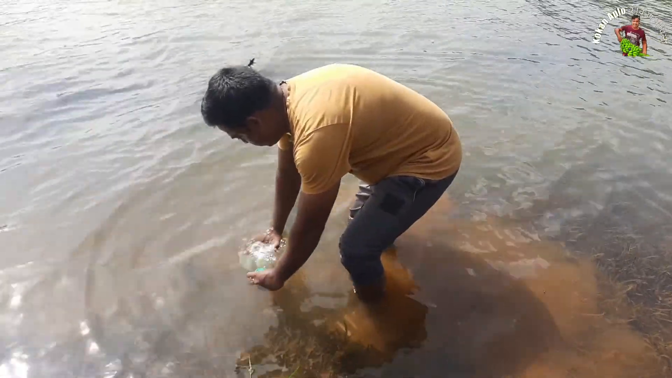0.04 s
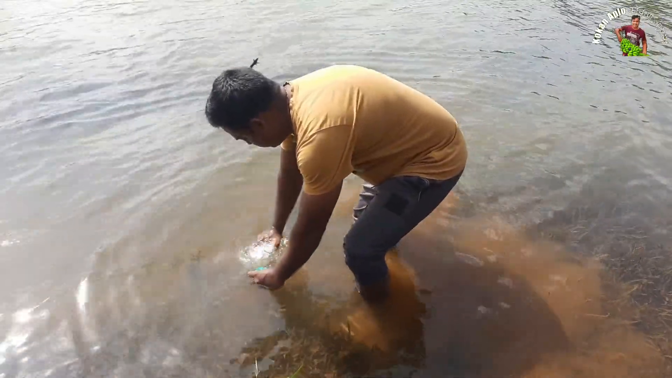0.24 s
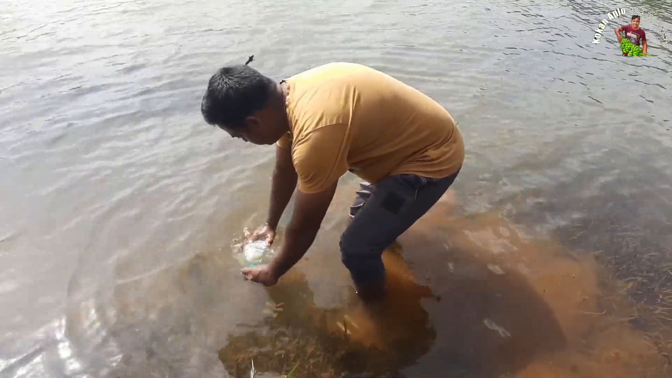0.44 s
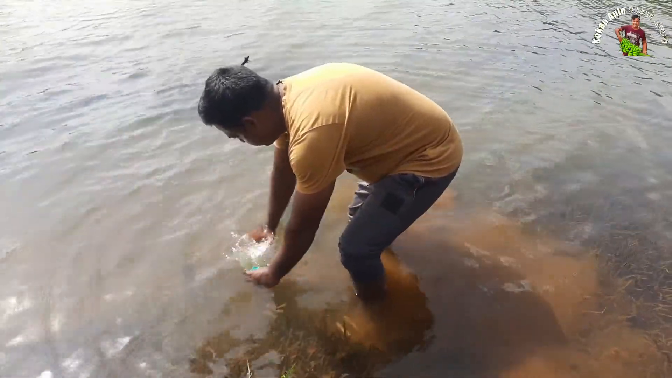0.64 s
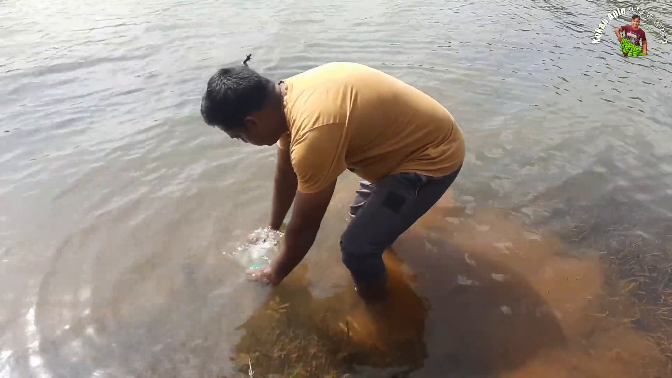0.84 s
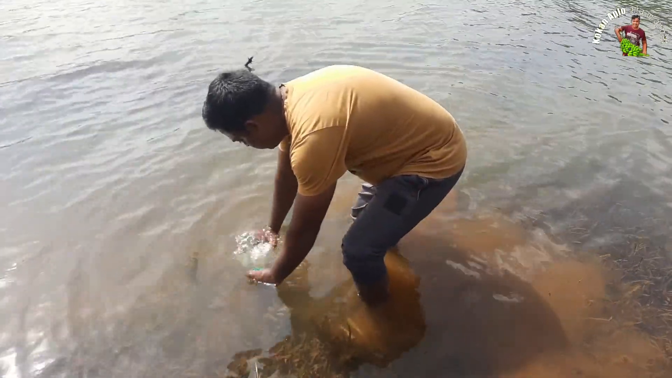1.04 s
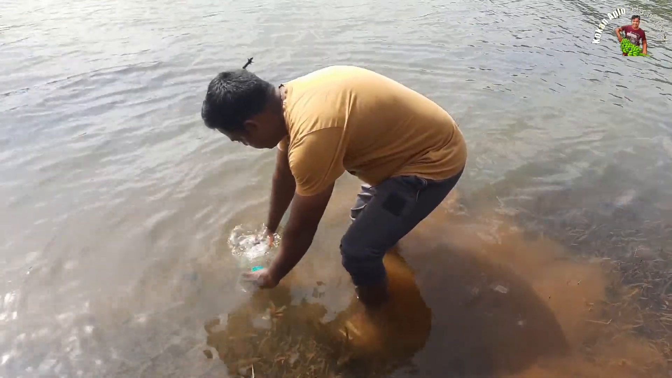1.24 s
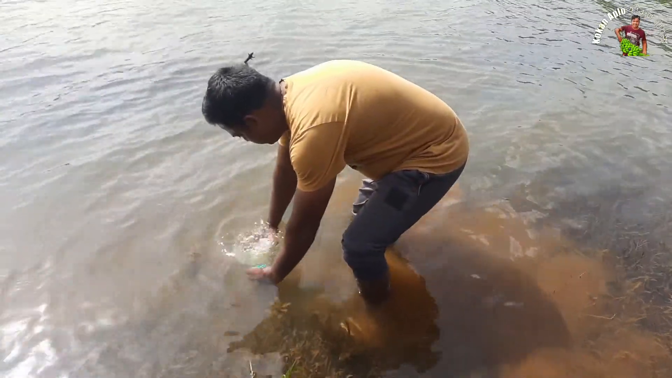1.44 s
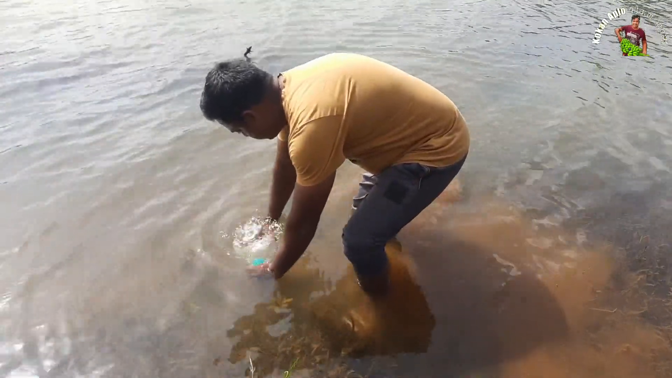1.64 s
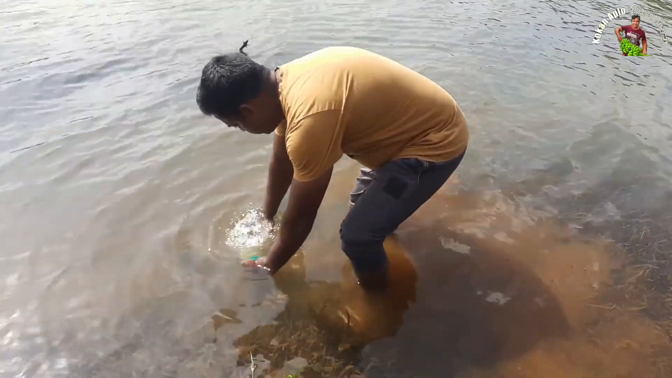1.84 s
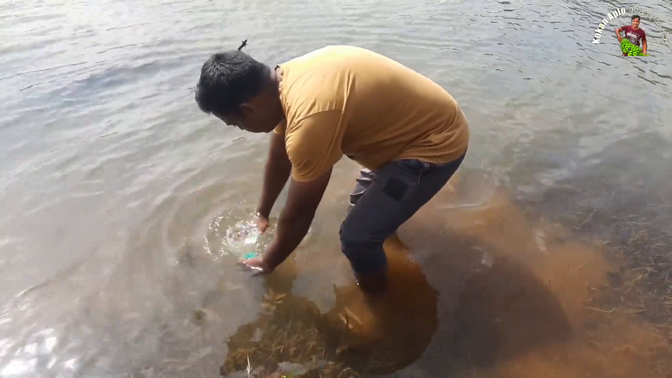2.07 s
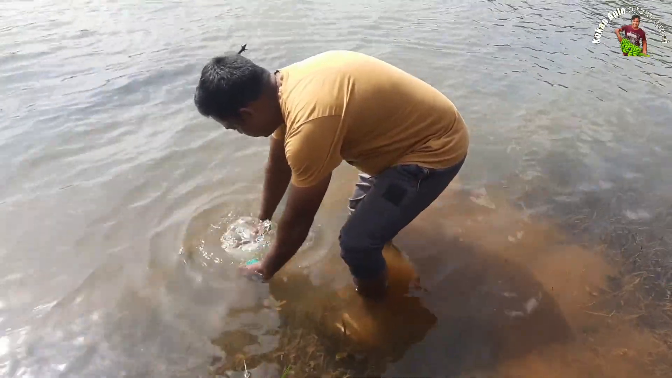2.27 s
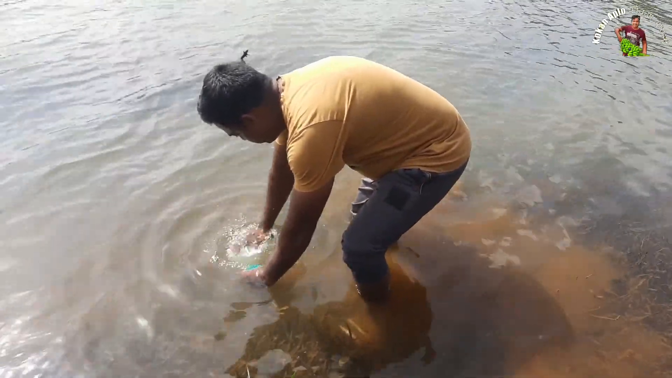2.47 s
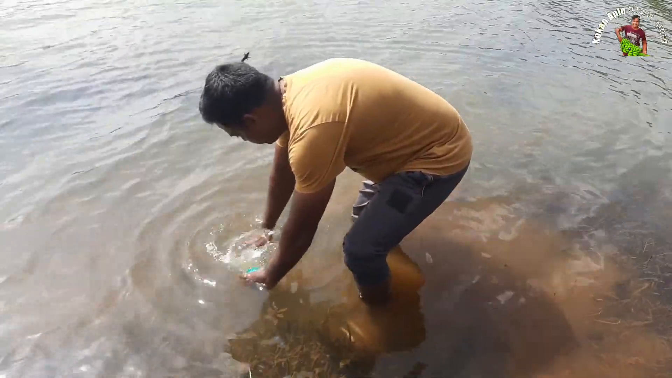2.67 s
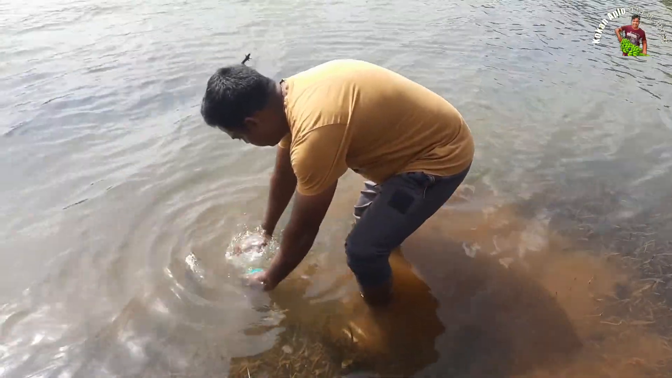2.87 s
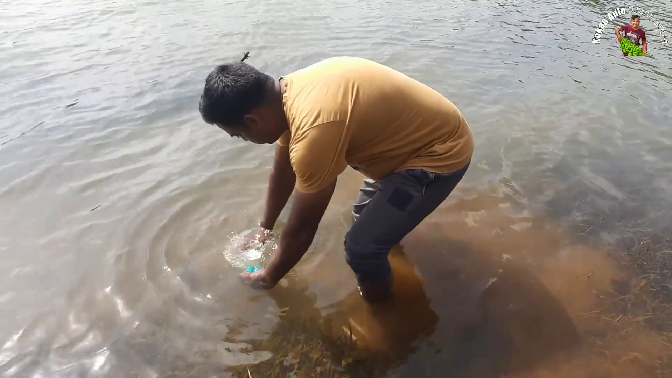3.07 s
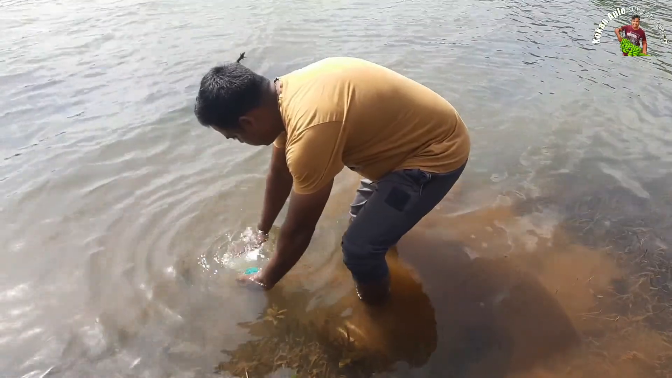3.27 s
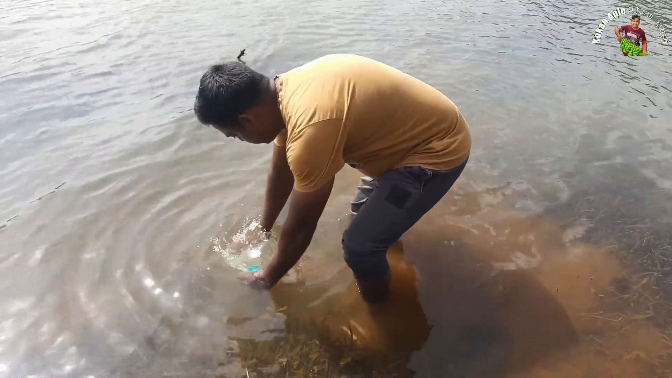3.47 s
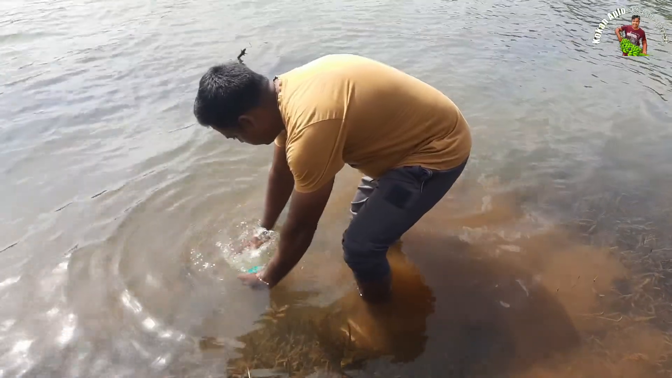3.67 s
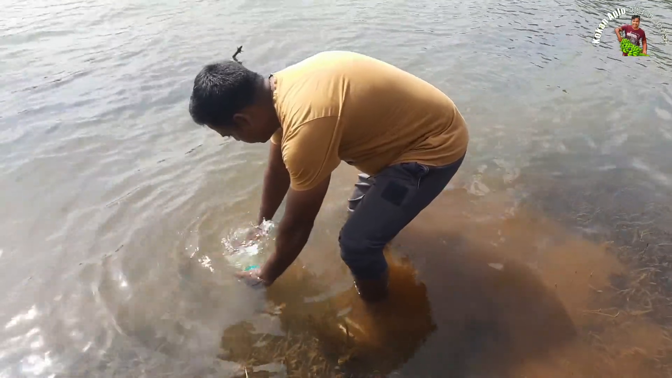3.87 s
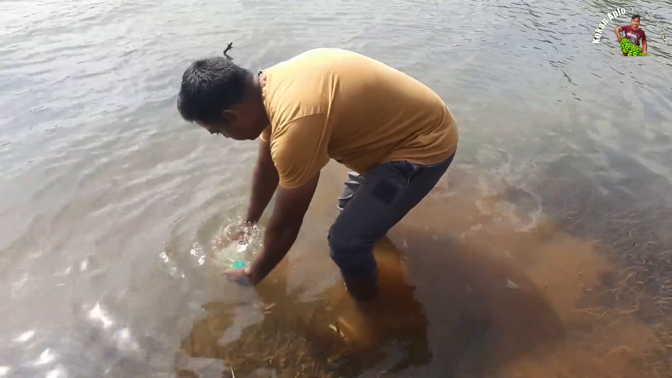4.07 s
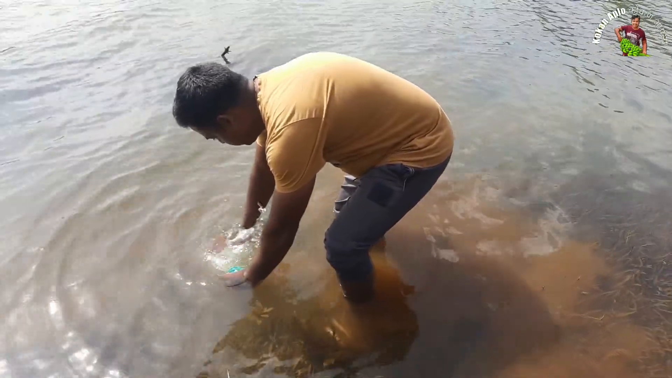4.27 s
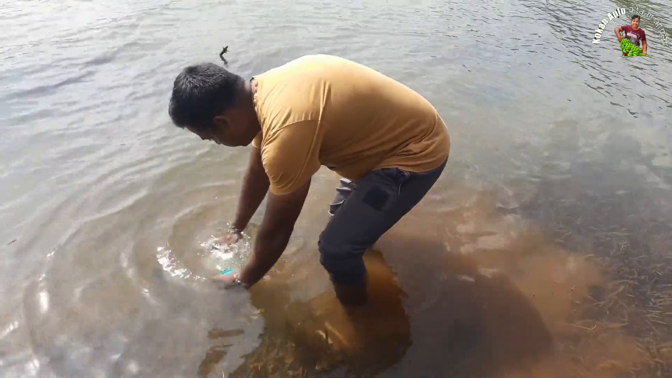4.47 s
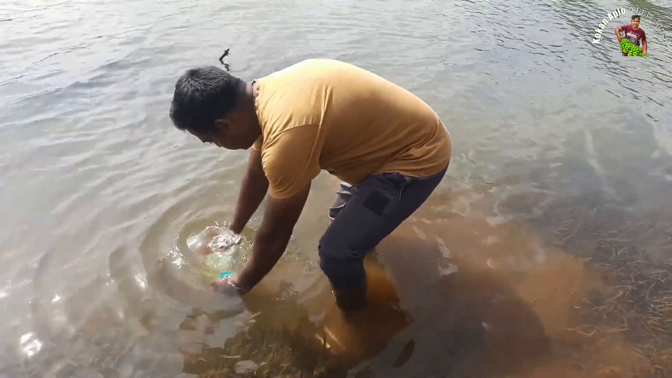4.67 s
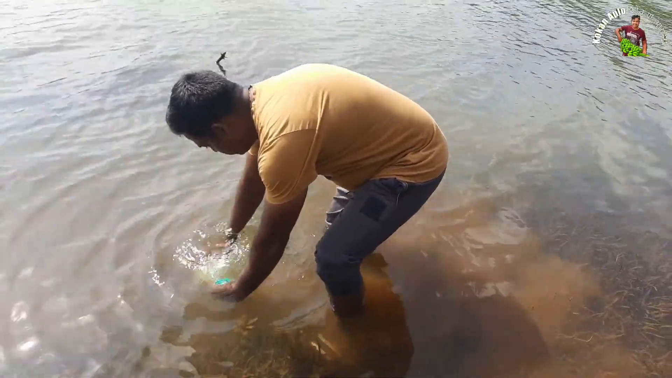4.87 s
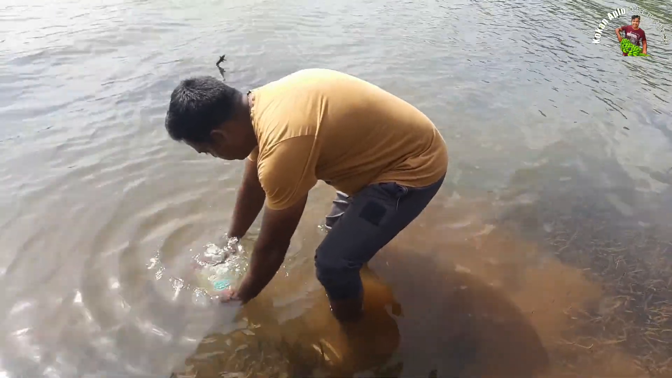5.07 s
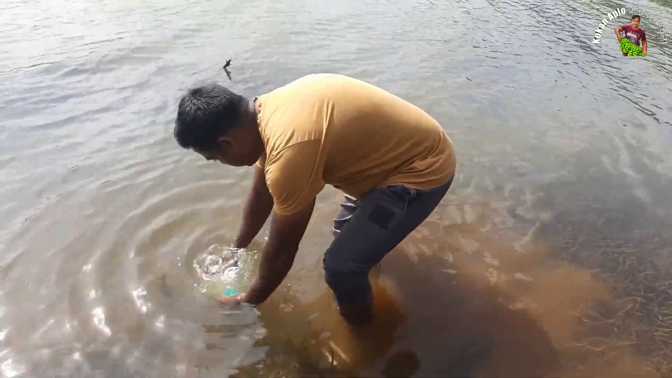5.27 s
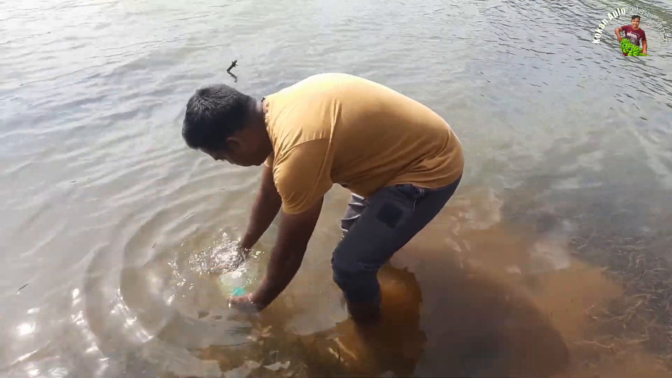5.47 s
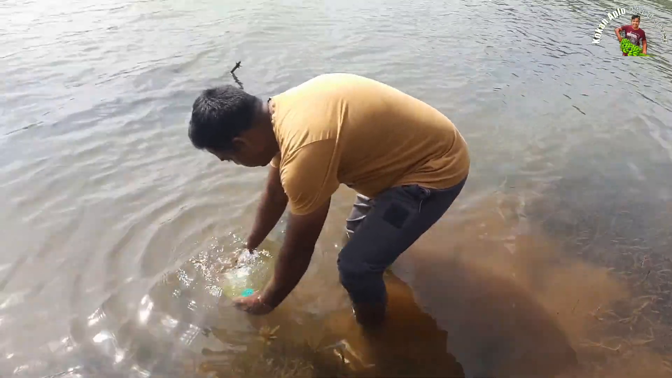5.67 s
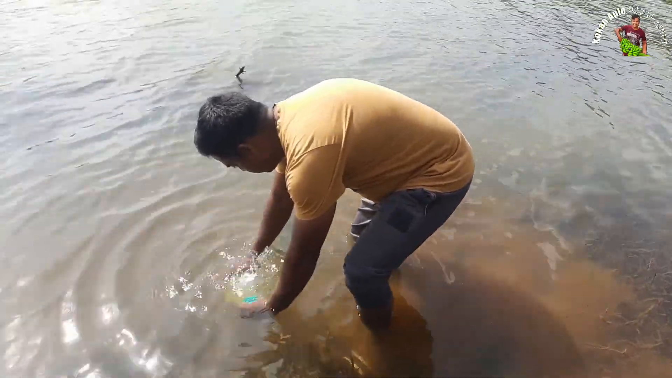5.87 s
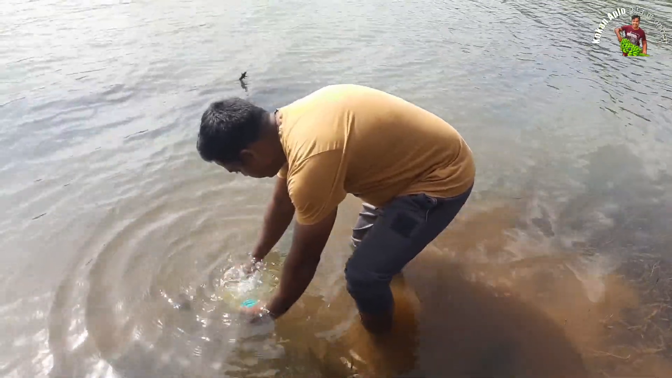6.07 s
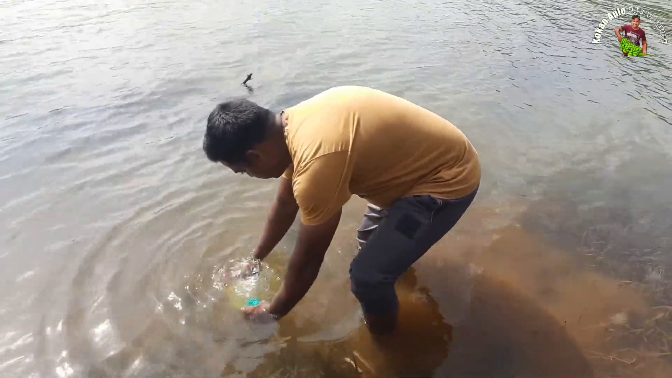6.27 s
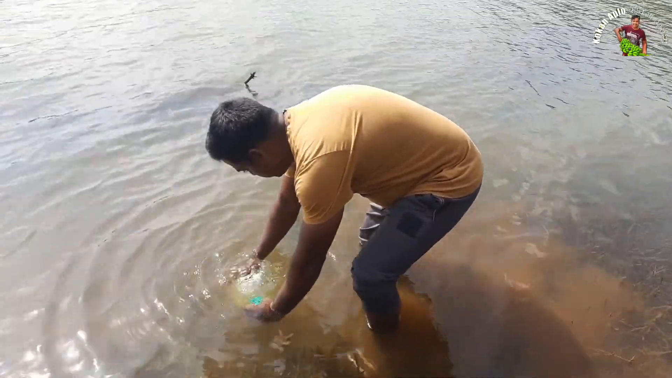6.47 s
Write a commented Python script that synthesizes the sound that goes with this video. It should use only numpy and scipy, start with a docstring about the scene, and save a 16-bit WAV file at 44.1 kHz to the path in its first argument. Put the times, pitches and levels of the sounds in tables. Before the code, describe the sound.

A plastic bottle is held under at a lake's edge and fills. A short slosh opens, then soft separate bubbles gurgle upward in pitch, with small plinks and ticks. A splashy burst comes near 2.4 seconds, the biggest gulp near 4.8, followed by dense popping and fizzing. Low wind thumps bump the microphone and strengthen toward the end. Outdoors, close, no echo, very faint insects behind.

```python
"""Water sloshes and the wind thumps the microphone: a plastic bottle is held under a lake and fills. Escaping
air gurgles as gliding tones that climb in pitch; sloshes are clouds of ringing bubbles. Bubble skins pop as
noise snaps with short tones, and spray patters as thousands of tiny rings over mist. Shaped noise makes the
breeze, a low thump at the end, the open air and the insects shrilling on shore. A bird calls far off in blurred
whistles."""
import sys
import numpy as np
from scipy import signal
from scipy.fft import rfft, irfft
from scipy.io import wavfile
from scipy.ndimage import uniform_filter1d

SR = 44100
rng = np.random.default_rng(int(sys.argv[2]) if len(sys.argv) > 2 else 0)


def unload_wav(signal):
    """Save mono or channel-first audio to the path in sys.argv[1] as 16-bit WAV at rate SR, clipped to [-1, 1]."""
    wavfile.write(
        sys.argv[1],
        SR,
        np.round(np.clip(np.atleast_2d(signal).T, -1, 1) * 32767).astype(np.int16),
    )


N = 287311  # length in samples
T = np.arange(N) / SR  # time of every sample, s


def undb(db):
    """Turn decibels into gain."""
    return 10 ** (np.asarray(db) / 20)


def unit(x):
    """Scale to an rms (average strength) of one."""
    return x / np.sqrt(np.mean(x ** 2) + 1e-20)


def curve(rows):
    """Join (time in s, value) rows by straight lines."""
    return np.interp(T, *np.transpose(rows))


def add(out, start_s, sound):
    """Mix a sound into out at the given time, cutting off whatever falls outside."""
    i = int(round(start_s * SR))
    lo, hi = max(i, 0), min(i + len(sound), len(out))
    if hi > lo:
        out[lo:hi] += sound[lo - i:hi - i]


def colour(x, points):
    """Filter a sound by a curve of (Hz, dB) points, at an rms of one."""
    hz, db = np.transpose(points)
    freq = np.maximum(np.fft.rfftfreq(len(x), 1 / SR), 1)
    gain = undb(np.interp(np.log(freq), np.log(hz), db))
    return unit(irfft(rfft(x) * gain, len(x)))


def noise():
    """Plain hiss for the whole scene."""
    return rng.standard_normal(N)


def walk(rate_hz):
    """Smooth random wandering with an rms of one; a higher rate wanders faster."""
    step = int(SR / rate_hz)
    stairs = np.repeat(rng.standard_normal(N // step + 1), step)
    return unit(uniform_filter1d(stairs, step)[:N])


def grain(hz, cycles, climb, swell=.0):
    """A small bubble rings for some cycles (to -60 dB) as its pitch climbs; swell softens the onset."""
    u = np.arange(int(cycles * SR / hz) + 2) * hz / (cycles * SR)  # 0 to 1 over the ring
    onset = 1 - np.exp(-u / (swell + 1e-9))
    tone = np.sin(2 * np.pi * cycles * u * (1 + climb * u / 2))
    return onset * tone * np.exp(-np.log(1000) * u)


# Tone of the open air. Columns: pitch_hz [Hz], strength_db [dB per Hz, relative]
AIR_COLOUR = [(30, -8.5), (120, 9.5), (250, 6.5), (500, -9), (1000, -8.5), (2200, -14.5), (4000, -14.5),
              (6500, -13.5), (10000, -15.5), (15000, -21.5)]
# Tone of the insects. Columns: pitch_hz [Hz], strength_db [dB per Hz, relative]
INSECT_TONE = [(5500, -35), (6700, -31), (7200, -4.5), (7800, -4.5), (8250, 3), (8700, 1.5), (9000, -4),
               (9300, -13), (11000, -30)]


def shore(air_db=-69, insect_db=-67.5, sway_db=1, shimmer_db=1.87):
    """Quiet air and a distant insect chorus are coloured noise; air sways slowly, insects shimmer faster."""
    air = colour(noise(), AIR_COLOUR) * undb(air_db + sway_db * walk(4.42))
    insects = colour(noise(), INSECT_TONE) * undb(insect_db + shimmer_db * walk(40))
    return air + insects


# Slow rise and fall of the breeze, joined by straight lines.
# Columns: time_s [s], level_db [dB before breeze gain]
SLOW_WIND = [(0, -44), (0.3, -47), (0.6, -54.5), (0.9, -56), (1.15, -70), (1.6, -62.5), (1.8, -67),
             (2.3, -68), (2.6, -67), (2.85, -59.5), (3.35, -58.5), (3.95, -62), (4.25, -58), (4.5, -40.5),
             (5.2, -46.5), (5.7, -40.5), (5.9, -49), (6.5, -31)]
# Short low swells of the wind's rumble, then in the last row a strong low thump at the very end. # Columns:
# peak_s [s], level_db [dB before breeze gain], half_length_s [s]
LOW_SWELLS = [(0.044, -34.5, 0.014), (0.25, -42.5, .05), (0.39, -44, .025), (0.803, -45.5, 0.054),
              (1.61, -56, 0.045), (2.174, -49, 0.099), (2.374, -43, 0.03), (2.472, -48, 0.021),
              (2.745, -41, 0.04), (2.814, -47, 0.063), (3.062, -45, 0.031), (3.131, -41.5, .018),
              (3.433, -43, 0.0072), (3.515, -45.5, 0.022), (3.797, -43.5, 0.02), (4.141, -43, 0.049),
              (4.32, -43.5, 0.027), (4.475, -41, 0.066), (4.757, -33, 0.019), (4.864, -32.5, 0.03),
              (5.101, -33.5, 0.039), (5.213, -34.5, .012), (5.38, -35.5, 0.088), (5.99, -33.5, 0.018),
              (6.058, -30, 0.039), (6.339, -27.5, 0.06), (6.53, -22, 0.035)]


def low_power():
    """Power of the low noise: the slow rise and fall of the breeze, plus the short low swells."""
    power = undb(curve(SLOW_WIND)) ** 2
    for peak_s, db, half in LOW_SWELLS:
        t = np.arange(-3 * half, 3 * half, 1 / SR)
        swell = undb(db) * np.exp(-(t / half) ** 2)
        add(power, peak_s + t[0], swell ** 2)
    return power


# Tone of the low noise on the microphone. Columns: pitch_hz [Hz], strength_db [dB per Hz, relative]
WIND_COLOUR = [(15, -33), (30, -13.5), (50, 0), (76, -0.5), (100, -8.5), (140, -17), (200, -25), (400, -45),
               (1000, -60.5), (3000, -68)]


def breeze(steadiness=0.88, gain_db=0.2):
    """Eddies rumble on the microphone: low noise, evened out, then set to the level of the moment; the same
    noise carries the thump at the end."""
    eddies = colour(noise(), WIND_COLOUR)
    strength = uniform_filter1d(np.abs(signal.hilbert(eddies)), SR // 25)
    return unit(eddies / strength ** steadiness) * np.sqrt(low_power()) * undb(gain_db)


# Changing fizz of the churned surface. Columns: time_s [s], level_db [dB before spray gain]
SLOW_FIZZ = [(0, -74), (0.6, -79), (1.5, -73.5), (2.9, -93), (3.4, -76.5), (3.95, -81), (4.3, -69.5),
             (4.68, -73.5), (4.95, -64), (5.21, -66.5), (5.52, -62), (5.8, -63), (5.98, -67.5), (6.5, -64)]
# Showers of fine spray. Columns: peak_s [s], level_db [dB before spray gain], fade_s [s]
SHOWERS = [(0.01, -56.5, 0.047), (0.43, -64, 0.067), (0.7, -68, 0.2), (1.41, -68, 0.039),
           (2.385, -71, 0.019), (2.45, -53, 0.053), (2.657, -57.5, 0.038), (3.31, -64, 0.03),
           (3.52, -62.5, 0.042), (4.556, -62, 0.027), (4.768, -57, 0.071), (5.63, -66, .07),
           (5.84, -65.5, 0.034), (6.15, -64.5, .04), (6.35, -58.5, 0.087)]


def spray_level(rise_s=0.031, puff_db=-31.5, puff_s=.018):
    """Spray in dB: the changing fizz, showers that rise and die away, and a puff from each pop."""
    power = undb(curve(SLOW_FIZZ)) ** 2
    for peak_s, db, fade_s in SHOWERS:
        slope_s = np.where(T < peak_s, rise_s, fade_s)
        power = power + (undb(db) * np.exp(-np.abs(T - peak_s) / slope_s)) ** 2
    puff = np.exp(-np.arange(SR // 5) / SR / puff_s)
    for start_s, db, _ in SKIN_POPS:
        add(power, start_s, (undb(db + puff_db) * puff) ** 2)
    return 10 * np.log10(power)


# Tone of the spray. Columns: pitch_hz [Hz], strength_db [dB, relative filter gain]
SPRAY_TONE = [(700, 4), (1600, -11), (2900, -8.5), (4000, -3), (5500, 1), (7500, 3), (10000, -1.5),
              (12500, -9), (15500, -14)]


def spray(scatter_db=4.0, mist_db=-4, gain_db=-2, lively_db=-65, count=5500):
    """Droplets and tiny bubbles tinkle over smooth mist; the weaker the spray, the more it is mist alone."""
    drops, level_db = np.zeros(N), spray_level()
    for when, size, ring, luck in rng.random((count, 4)):
        hz = 1500 + 12500 * size ** 1.3
        ring_s = 0.0014 + .016 * ring * np.sqrt(4000 / hz)
        # a few drops are much stronger than the rest
        strength = undb(scatter_db * min(-np.log(1 - luck), 4))
        drop = grain(hz, hz * ring_s, climb=.04, swell=0.0033)
        add(drops, when * N / SR, strength / np.sqrt(ring_s) * drop)
    lively = 1 / (1 + undb(lively_db - level_db) ** 2)  # share of drops, near 1 in strong spray
    mist = undb(mist_db) * noise()
    fizz = colour(unit(drops * np.sqrt(lively)) + mist, SPRAY_TONE)
    return fizz * undb(level_db + gain_db)


# Water folding over at the bottle's neck. Columns: middle_s [s], half_length_s [s],
# level_db [dB before gain and length scaling], centre_hz [Hz], spread_octaves [octaves]
NECK_SLOSHES = [(0.016, 0.024, -42.5, 211, 0.52), (.012, 0.017, -44.5, 690, 0.31),
                (.013, .025, -47.5, 1350, 0.5), (0.188, .045, -67.5, 1380, 0.51),
                (.244, .019, -63, 886, 0.356), (.32, .04, -70, 1620, 0.475), (.595, 0.046, -51, 258, 0.86),
                (.599, .023, -52.5, 730, 0.66), (0.791, 0.047, -63.5, 954, 0.39),
                (1.005, .022, -59, 700, 0.57), (1.076, 0.029, -69, 1300, .49),
                (1.326, .011, -59, 395, 0.63), (1.43, 0.031, -59, 997, 0.3), (1.438, 0.054, -64, 257, .42),
                (1.504, 0.023, -66, 706, 0.75), (1.841, .03, -61.5, 253, 0.2),
                (1.934, 0.0085, -59.5, 1420, 1.09), (2.413, 0.037, -45.5, 293, 0.79),
                (2.425, 0.0301, -43.5, 233.6, 0.16), (2.412, 0.014, -64, 2070, 0.12),
                (2.453, 0.037, -64, 3550, 0.061), (2.423, 0.049, -68, 4980, 0.065),
                (2.629, 0.0065, -55.5, 1765, 0.82), (2.832, 0.038, -63.5, 268, 0.5),
                (3.107, 0.021, -62.5, 504, 0.2), (3.32, 0.029, -64, 1250, 0.71),
                (3.402, 0.0039, -50.5, 668, 0.5), (3.432, 0.015, -58.5, 1060, 0.45),
                (3.486, 0.04, -67, 1076, 0.37), (3.469, 0.061, -60, 225, 0.36),
                (3.719, 0.014, -50.5, 300, 0.56), (3.745, 0.018, -71.5, 3450, 0.25),
                (3.993, 0.023, -56.5, 440, 0.4), (4.343, .004, -57, 2050, 0.31),
                (4.853, 0.023, -46, 434, 0.72), (4.918, .035, -51.5, 1284, 0.12),
                (5.513, .04, -53, 558, 0.38), (5.689, 0.059, -57.5, 540, .53),
                (6.183, 0.046, -64, 765, 0.5), (6.437, .045, -67, 563, .78)]


def sloshes(ring_s=0.04, scatter_db=2, swell=0.049, lead_s=.005, wash_db=-6, gain_db=-1, count=30):
    """Each slosh is a cloud of damped bubbles in a low rush of water; larger bubbles ring longer."""
    out, t = np.zeros(N), np.arange(SR) / SR - .5
    for middle_s, half, db, centre, spread in NECK_SLOSHES:
        cloud = np.zeros(SR)
        chances = rng.standard_normal((count, 3))
        for size, (when, jitter, strength) in zip(np.linspace(-1, 1, count), chances):
            hz = centre * 2 ** (spread * (size + size ** 3 / 2 + jitter / 10))
            ring = grain(hz, ring_s * np.sqrt(700 * hz), .14, swell)  # ring_s holds at 700 Hz
            gain = undb(scatter_db * strength - 3.0 * size ** 2)
            add(cloud, .5 - lead_s + 0.54 * half * np.clip(when, -2, 2), gain * ring)
        # the rush stops sharply four spreads below the centre pitch: (spreads, dB)
        edge = [(-5, -27), (-4, -27 + 28 / 3), (-3.9999, -94)]
        low_tone = [(centre * 2 ** (k * spread), drop_db) for k, drop_db in edge]
        rush = colour(rng.standard_normal(SR), low_tone) * np.exp(-(t / (1.53 * half)) ** 2)
        slosh = unit(cloud) + undb(wash_db) * unit(rush)
        add(out, middle_s - .5, undb(db + gain_db) * slosh * np.sqrt(2 * half))
    return out


def simmer(db=-61, range_db=10, lowest_hz=1300, octaves=2.2, cycles=40, climb=0.084, after_s=.03, count=12):
    """Little bubbles tick at the surface during each slosh and in its wake."""
    out = np.zeros(N)
    for middle_s, half, _, _, _ in NECK_SLOSHES:
        for when, size, weakness in rng.random((count, 3)):
            tick = grain(lowest_hz * 2 ** (octaves * size), cycles, climb, swell=0.024)
            start_s = middle_s - half + (3 * half + after_s) * when
            add(out, start_s, undb(db - range_db * weakness) * tick)
    return out


# Bursting skins and droplets. Columns: start_s [s, before a tiny delay],
# peak_db [dB before pop gain], pitch_hz [Hz]
SKIN_POPS = [(0.23, -36.5, 8400), (0.3918, -38, 4630), (1.0949, -40.5, 8430), (1.2035, -46, 8000),
             (1.375, -43.5, 6060), (1.53, -44.5, 8750), (2.0814, -38, 7600), (2.4443, -38, 7050),
             (2.4683, -36, 7800), (2.5052, -36.5, 7830), (2.5208, -39, 8000), (2.6187, -31.5, 6360),
             (2.6558, -35, 7630), (3.0298, -35, 8600), (3.168, -46, 4300), (3.3965, -46, 7500),
             (3.5567, -43.5, 9240), (3.798, -40, 4280), (4.2285, -35, 2980), (4.8483, -37.5, 9370),
             (4.9258, -31.5, 8700), (4.938, -33, 5850), (4.9795, -36.5, 4770), (5.0068, -36, 11200),
             (5.0333, -33.5, 4940), (5.0535, -33.5, 7450), (5.1, -33.5, 8700), (5.1048, -30, 5440),
             (5.1249, -31.5, 7150), (5.2615, -32.5, 6150), (5.2835, -31.5, 4090), (5.4263, -20, 7700),
             (5.4502, -35, 7300), (5.46, -31, 4740), (5.4939, -33.5, 6230), (5.5737, -37, 8370),
             (5.6125, -29.5, 6100), (5.6664, -35, 7000), (5.71, -37.5, 6000), (5.7835, -38, 7400),
             (6.107, -35, 9400), (6.2253, -35.5, 8530), (6.348, -35.5, 6670), (6.488, -36, 8570)]


def pops(snap_s=0.00014, patter_s=0.014, patter_db=-19, ring_db=-5, ring_s=0.02, gain_db=-2.5,
         low_share=0.77, pair=0.863):
    """A skin snaps with a faint noise tail, and the cavity beneath rings with two close tones."""
    out, t = np.zeros(N), np.arange(SR // 20) / SR
    for start_s, db, hz in SKIN_POPS:
        # a small cavity radiates little below its own pitch
        band = signal.butter(3, [min(low_share * hz, 5400), 12500], "band", fs=SR, output="sos")
        fade = np.exp(-t / snap_s) + undb(patter_db) * np.exp(-t / patter_s)
        pop = signal.sosfilt(band, rng.standard_normal(len(t)) * fade)
        pop = pop / np.abs(pop).max()
        add(pop, 0, undb(ring_db) * grain(hz, hz * ring_s, 0.052, 0.0056))
        add(pop, 0, undb(ring_db) / 2 * grain(pair * hz, hz * ring_s, 0.12, 0.0056))
        add(out, start_s + 0.00089, undb(db + gain_db) * pop / np.abs(pop).max())
    return out


# Gulps of air. Columns: loudest_s [s], pitch_hz [Hz at that moment, before wobble],
# climb [octaves per s], swell_s [s], peak_db [dB before flutter and bursting]
AIR_GULPS = [(0.809, 763, 28, .008, -52.5), (0.888, 638, 22.5, .014, -47), (0.933, 740, 6.5, .022, -45.5),
             (1.023, 1086, 14.5, .022, -48.5), (1.223, 339, 20.5, .032, -41), (1.348, 630, 12, .025, -49.5),
             (1.439, 1096, 18, .01, -53), (1.628, 331, 21.5, .02, -35.5), (1.695, 426, 19.5, .042, -59.5),
             (1.927, 476.6, 17, .038, -45), (2.079, 296.6, 20.5, .029, -54.5), (2.12, 612, 19.5, .025, -42),
             (2.305, 656, 15, .043, -44), (2.413, 545, 12.5, .019, -43), (2.56, 884, 16.5, .04, -62),
             (2.642, 1223, 35, .033, -51.5), (2.93, 675, 11, .05, -50), (3.16, 653, 6.5, .015, -48),
             (3.196, 960, 28, .013, -53.5), (3.312, 1295, 11.5, .038, -57), (3.744, 638, 24, .036, -52),
             (4.023, 597, 2, .035, -48.5), (4.067, 543, 21, .042, -38), (4.343, 730, 16, .045, -51),
             (4.401, 313.5, 16.5, .073, -44), (4.76, 387.5, 21, .06, -26.5), (4.866, 653, 21, .021, -34.5),
             (4.899, 747, 12, .012, -33), (5.13, 988, 22, .009, -48), (5.146, 1534, 37, .025, -55),
             (5.203, 264, 11, .084, -46.5), (5.268, 600, 13.5, .042, -52), (5.426, 346, 26.5, .02, -48.5),
             (5.492, 469.6, 11.5, .012, -31.5), (5.52, 594.5, 14, .03, -38.5),
             (5.592, 642, 16.5, .045, -47), (5.724, 677, 6.5, 0.014, -44), (5.763, 640, 22.5, .022, -40.5),
             (5.925, 1565, 30, .023, -49), (6.153, 830, 15.5, .007, -51), (6.235, 632, 25.5, .04, -44.5),
             (6.36, 624, 11, .07, -53), (6.372, 1625, 28, .009, -38.5), (6.418, 390, 25.5, .052, -54.5),
             (6.46, 650, 26, .019, -34.5)]
# Bubbles that pinch off at once and nearly hold their pitch. Columns: loudest_s [s],
# pitch_hz [Hz before wobble], peak_db [dB before flutter and bursting]
SUDDEN_PLINKS = [(0.752, 776, -44), (1.502, 770, -51.5), (1.717, 1260, -60.5), (1.755, 3600, -58),
                 (1.785, 1940, -59), (1.922, 527, -35.5), (2.351, 764, -36.5), (2.514, 1810, -50),
                 (2.89, 2430, -51), (3.556, 920, -47.5), (3.557, 1780, -53.5), (4.341, 2530, -46),
                 (4.914, 1330, -47), (4.983, 1330, -44.5), (5.054, 1090, -51.5), (5.365, 1193, -57),
                 (5.454, 800, -42), (5.683, 1240, -50.5), (5.874, 863, -46), (5.884, 1510, -46.5),
                 (6.181, 284, -46), (6.337, 3020, -52), (6.489, 3400, -54.5)]


def gurgles(wobble=0.041, flutter_db=2.0, overtone_db=-34, glide_limit_s=0.19, wash_db=-21, burst_hz=830,
            ring_s=.0098, ring_slope=.9, plink_climb=0.94, plink_attack_s=0.00159):
    """Each gulp swells at the neck and rings higher as the water above it thins; plinks start at once."""
    out, drift, flutter, ripple = np.zeros(N), walk(160), walk(130), walk(700)
    plinks = [(s, hz, plink_climb, plink_attack_s, db) for s, hz, db in SUDDEN_PLINKS]
    for loudest_s, hz, climb, swell, db in list(AIR_GULPS) + plinks:
        fade = ring_s * (1000 / hz) ** ring_slope  # ring_s holds at 1 kHz; higher bubbles fade sooner
        span = (T > loudest_s - swell) & (T < loudest_s + 5 * fade)
        t = T[span] - loudest_s
        pitch = hz * 2 ** (climb * np.minimum(t, glide_limit_s)) * (1 + wobble * drift[span])
        phase = 2 * np.pi * np.cumsum(pitch) / SR
        shape = np.where(t < 0, 1 + t / swell, np.exp(-np.abs(t / fade) ** 1.11))
        # a big bubble breaks the surface once its pitch has climbed far enough
        alive = 1 / (1 + (pitch / max(burst_hz, 1.23 * hz)) ** 16)
        # ripples on its wall blur the tone a little
        blur = undb(wash_db) * ripple[span] * np.cos(phase)
        tone = np.sin(phase) + undb(overtone_db) * np.sin(2 * phase) + blur
        out[span] += undb(db + flutter_db * flutter[span]) * shape * alive * tone
    return out


def offspring(below_db=-15, loudest_db=-51, after_s=.06, cycles=48, climb=0.19, octaves=2.9, count=3):
    """Every gulp sheds a few smaller, higher bubbles as it tears away from the neck."""
    out = np.zeros(N)
    for loudest_s, hz, _, _, db in AIR_GULPS:
        for when, size, weakness in rng.random((count, 3)):
            pitch = 1.3 * max(hz, 600) * 2 ** (octaves * size)
            gain = undb(min(db + below_db, loudest_db) - 8 * weakness)
            start_s = loudest_s + after_s * (2 * when - .5)
            add(out, start_s, gain * grain(pitch, cycles, climb, swell=0.079))
    return out


# Faint bird calls. Columns: start_s [s], length_s [s, then an equally long fade],
# first_hz [Hz], last_hz [Hz], level_db [dB before shaping and blur]
BIRD_CALLS = [(1.19, 0.17, 2304, 2030, -72), (4.46, 0.1, 1903, 1940, -71)]


def bird(blur_hz=330):
    """Thin gliding whistles, smeared by their long way over the water."""
    out = np.zeros(N)
    for s, length, first_hz, last_hz, db in BIRD_CALLS:
        pitch = np.interp(T, [s, s + length], [first_hz, last_hz])
        phase = 2 * np.pi * np.cumsum(pitch) / SR
        shape = np.interp(T, [s, s + length / 10, s + length, s + 2 * length], [0.044, 0.89, 0.55, 0])
        whistle = walk(blur_hz) * np.sin(phase) + walk(blur_hz) * np.cos(phase)
        out += undb(db) * shape * whistle
    return out


def froth(start_s=4.74, peak_s=4.85, end_s=5.07, db=-52):
    """The biggest gulp throws up a sheet of water that falls back with a hiss of coloured noise."""
    tone = [(1000, -8), (2000, -8), (3300, -10.0), (5200, 6), (6500, -3), (8000, 5.5), (10000, 4.5),
            (13000, -19)]  # (Hz, dB)
    return undb(db) * colour(noise(), tone) * np.interp(T, [start_s, peak_s, end_s], [0, 1, 0])


def scene():
    """Everything in the open air, with no echo."""
    water = spray() + sloshes() + simmer() + pops() + gurgles() + offspring() + froth()
    return (shore() + breeze() + water + bird())[None]


def record(dry, top_hz=15700):
    """The recorder cuts the top: a steep filter removes what lies above top_hz."""
    return signal.sosfilt(signal.ellip(10, .2, 70, top_hz, fs=SR, output="sos"), dry)


dry = scene()
out = record(dry)
unload_wav(out)
```